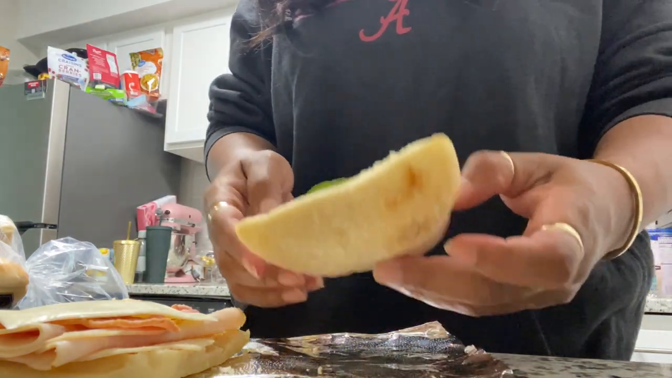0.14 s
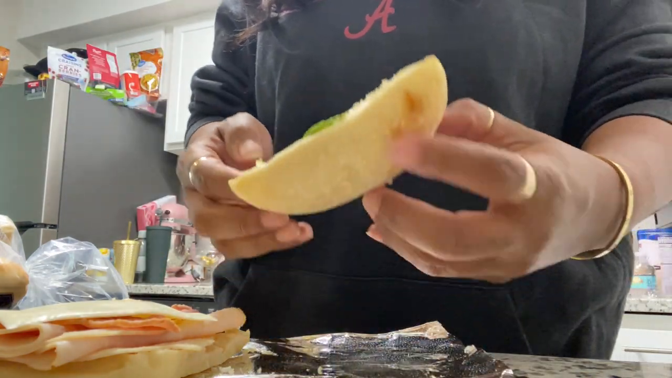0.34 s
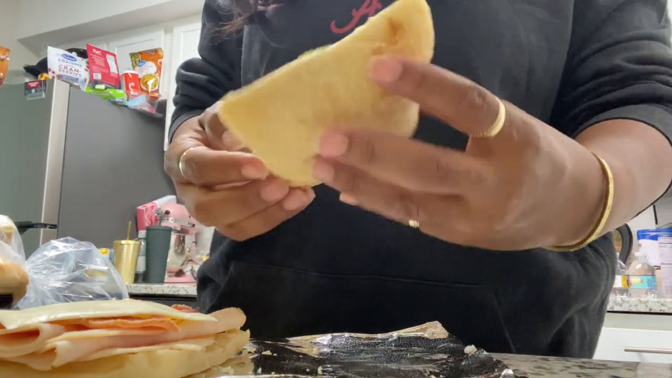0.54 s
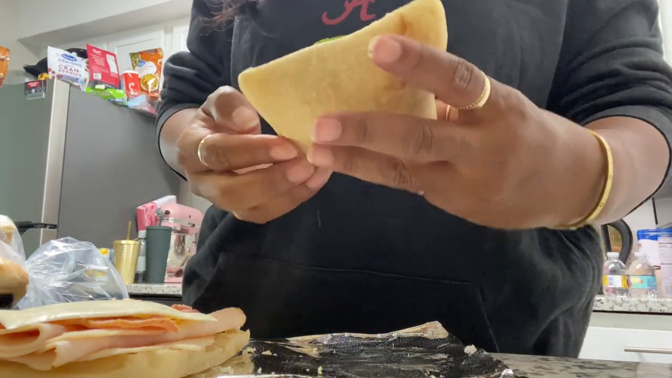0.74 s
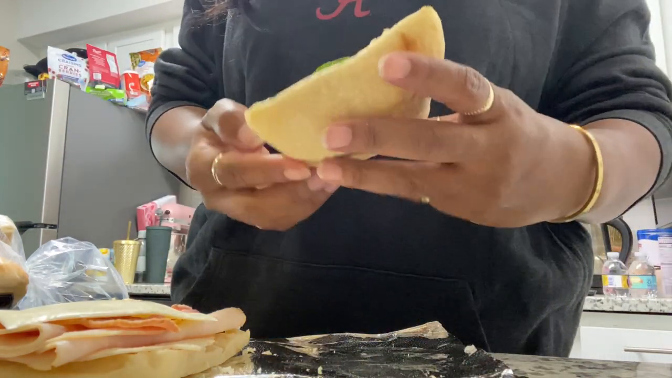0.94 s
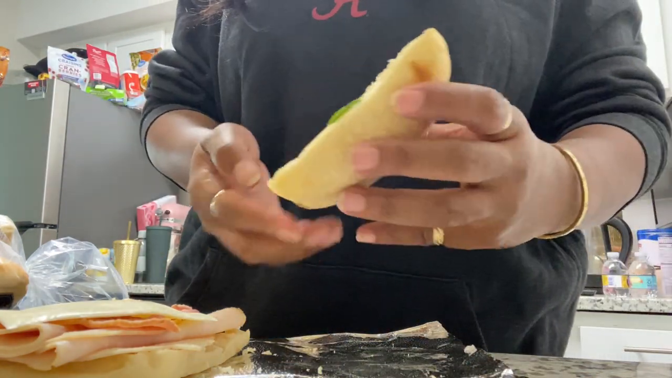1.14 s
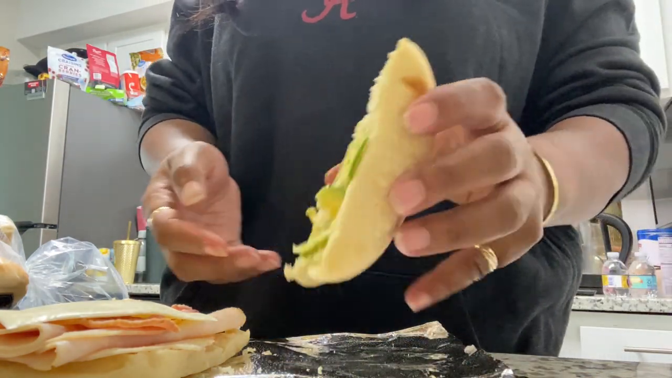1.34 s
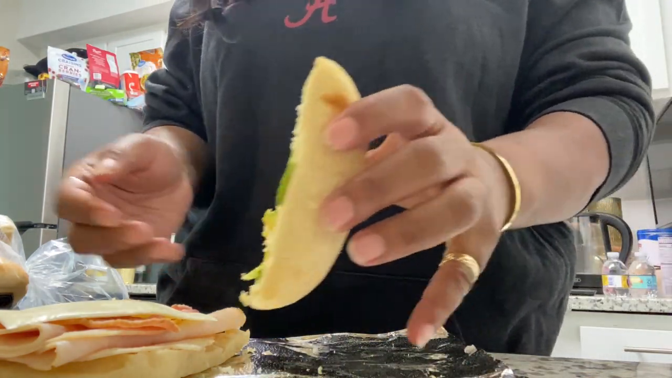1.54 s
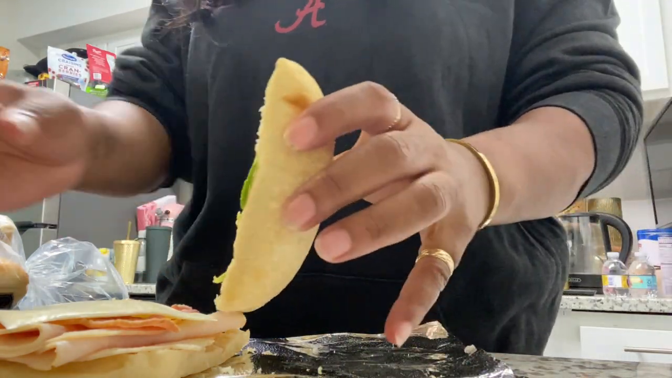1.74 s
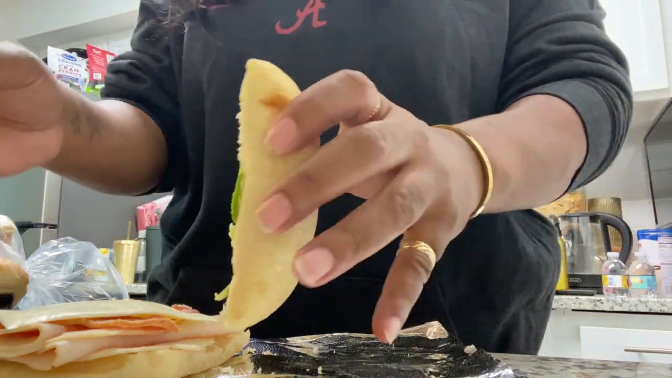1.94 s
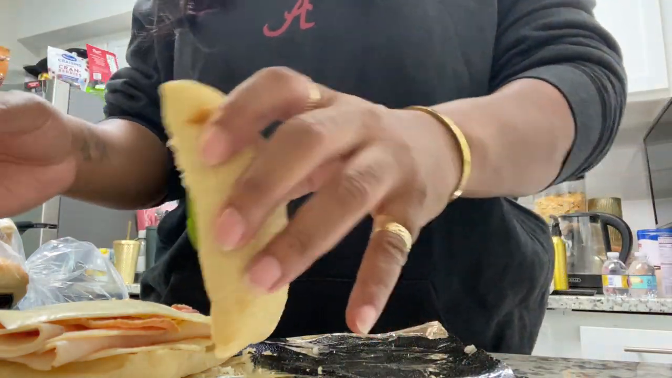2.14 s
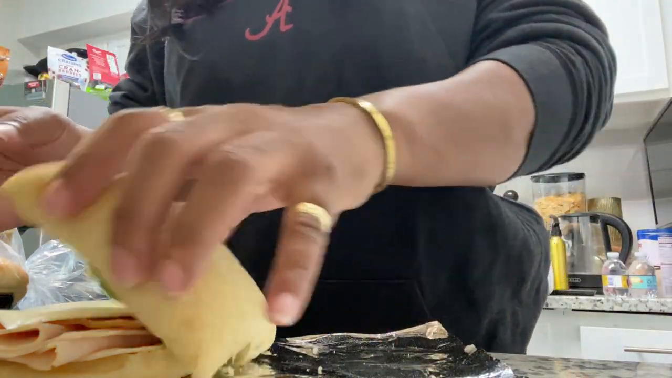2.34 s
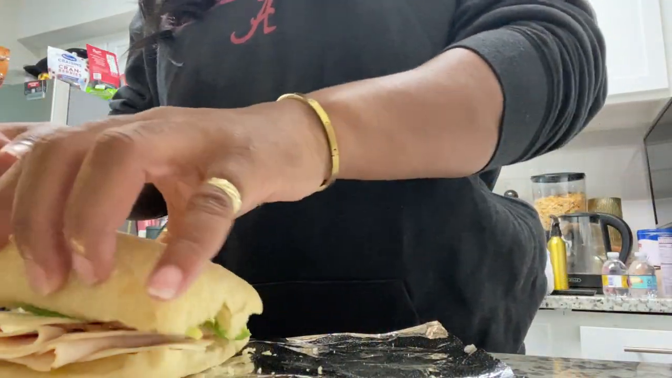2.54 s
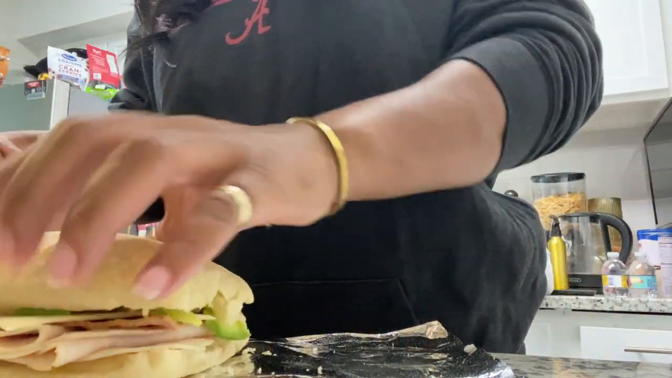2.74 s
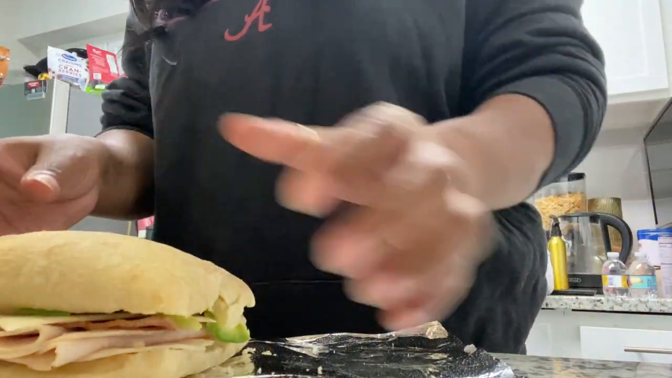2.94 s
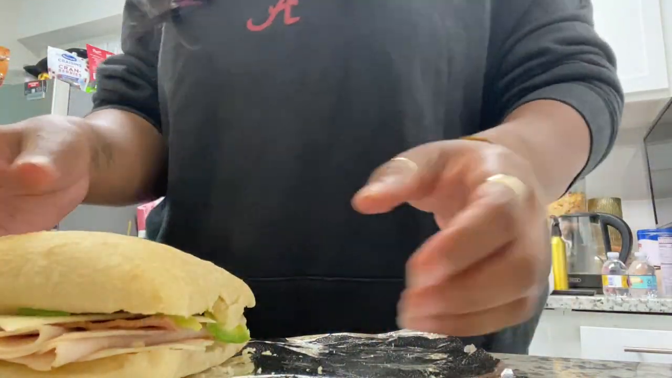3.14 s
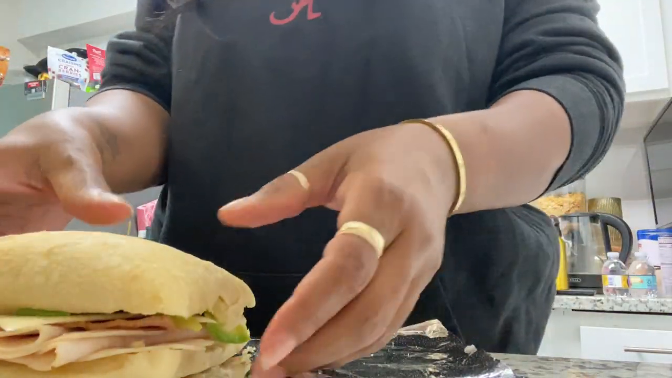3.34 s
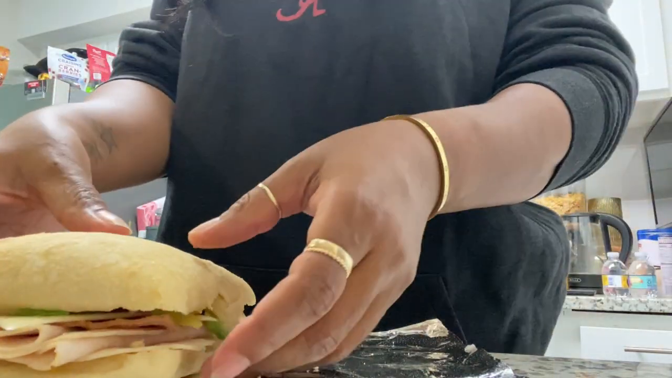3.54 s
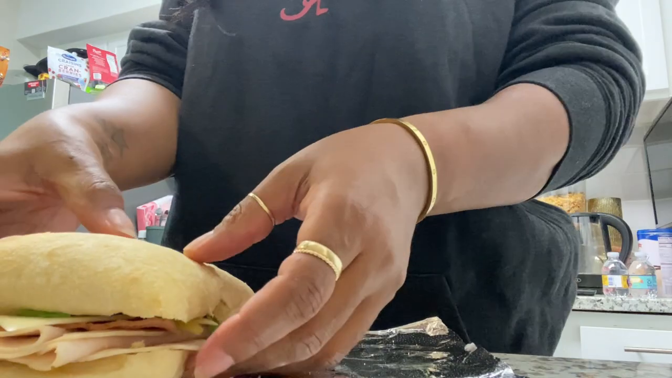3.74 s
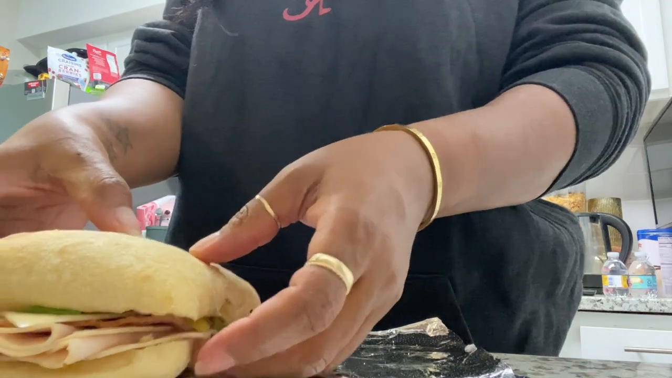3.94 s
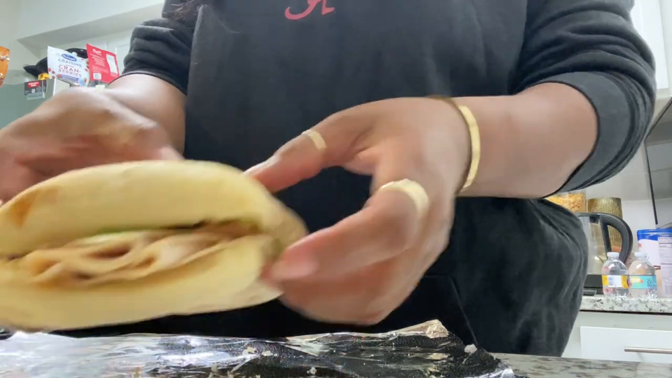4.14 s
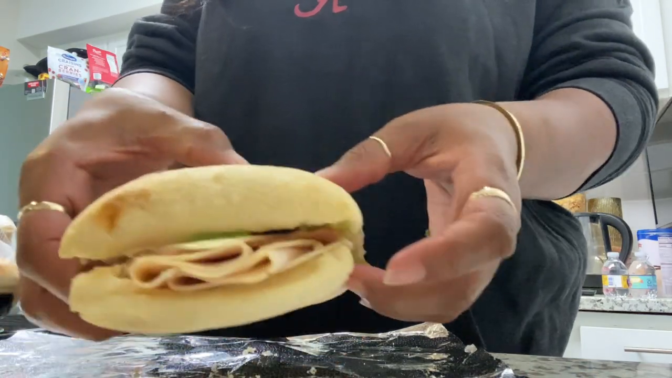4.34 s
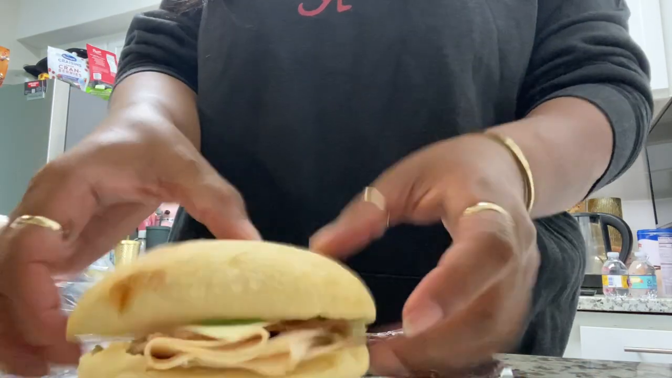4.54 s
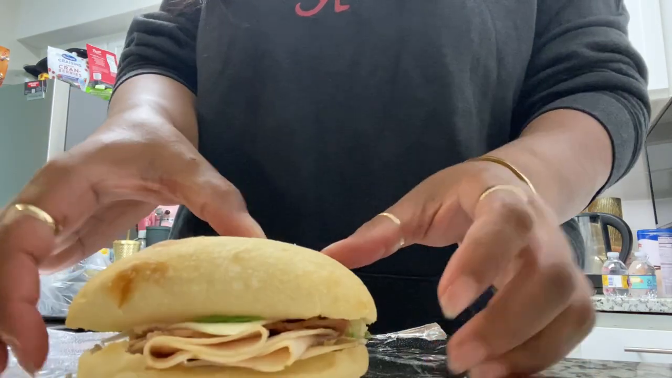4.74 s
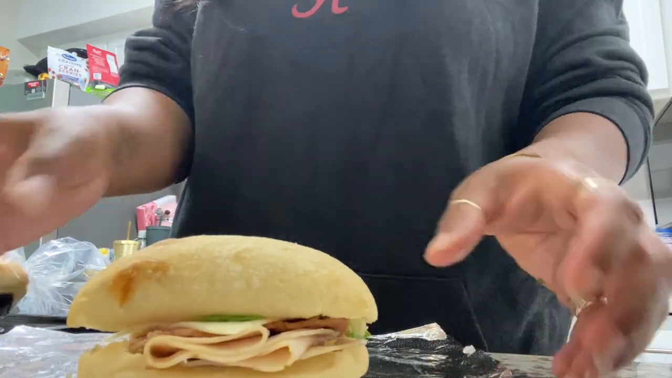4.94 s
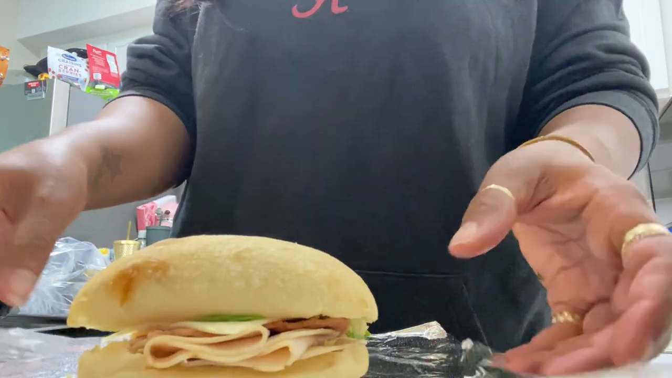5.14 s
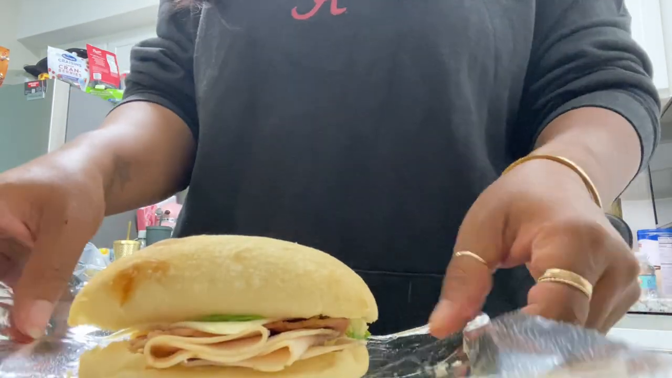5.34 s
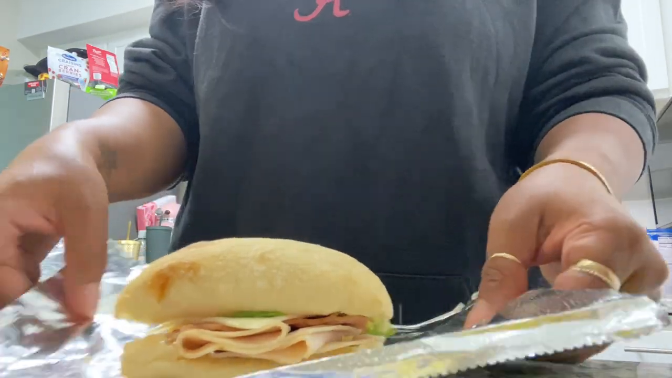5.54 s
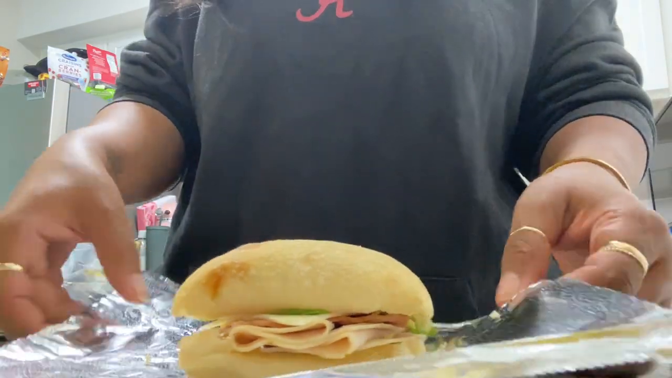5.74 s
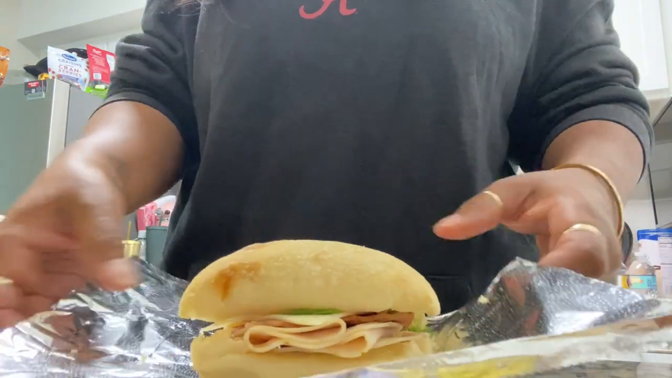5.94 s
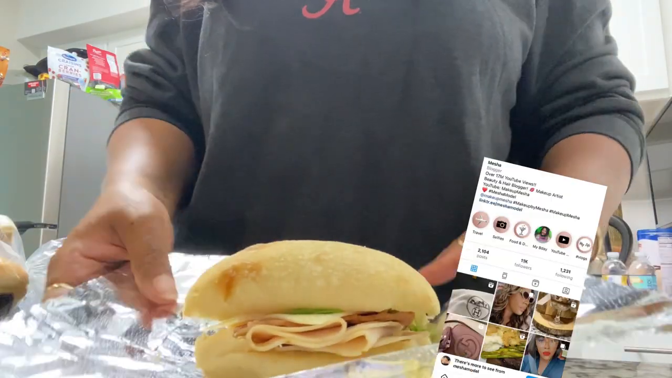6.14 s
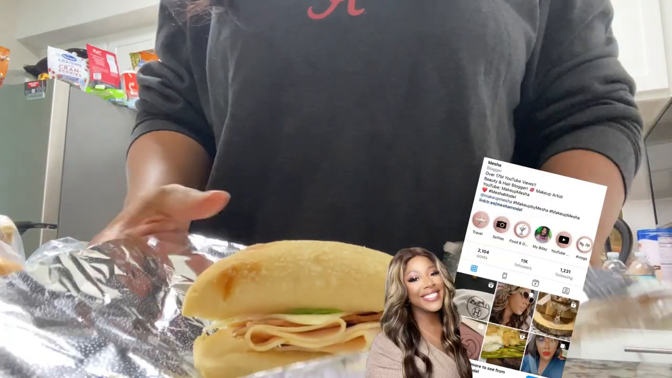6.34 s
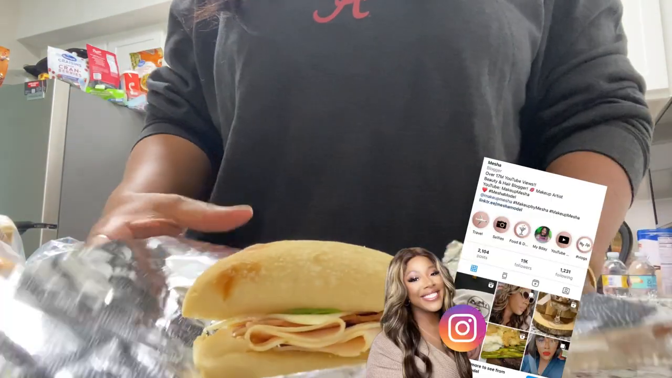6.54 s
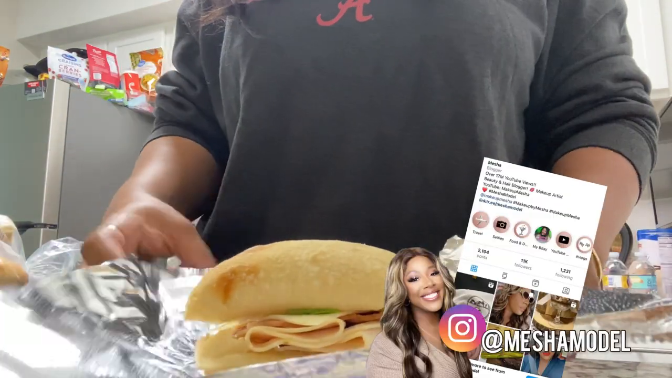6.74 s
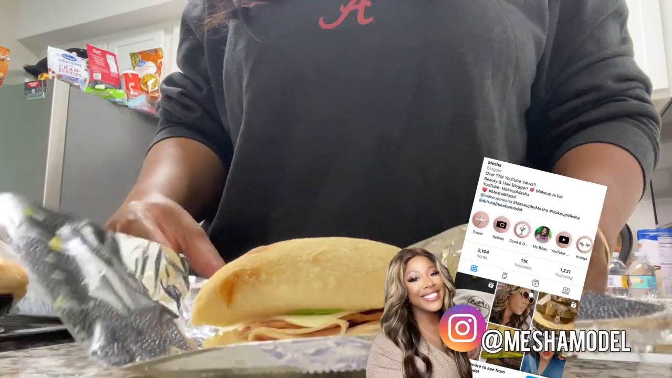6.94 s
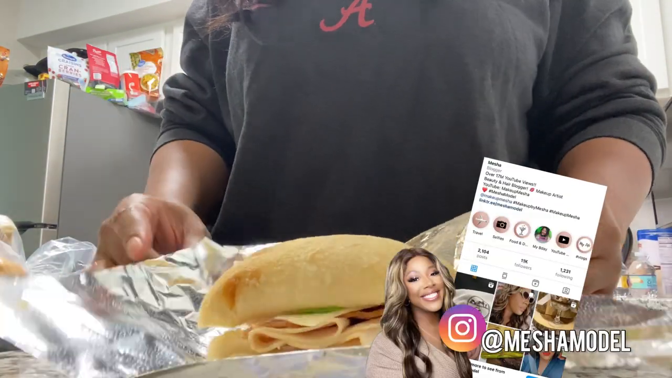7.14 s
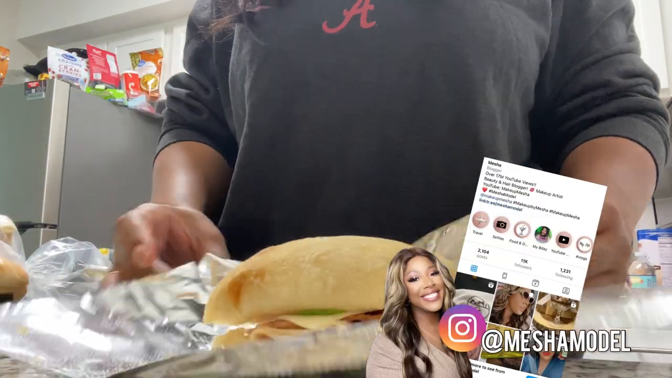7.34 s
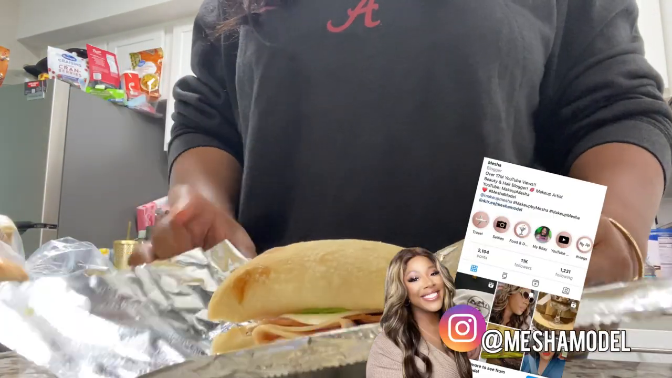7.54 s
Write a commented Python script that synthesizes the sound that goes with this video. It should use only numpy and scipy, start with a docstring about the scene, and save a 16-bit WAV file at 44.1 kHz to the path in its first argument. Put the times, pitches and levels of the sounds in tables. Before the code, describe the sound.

In a quiet kitchen with a faint, distant engine hum, aluminium foil snaps sharply along with a hollow knock and bumps on the counter. After a few small ticks the foil crinkles briefly, and a sandwich lands on it with a thud and a crack. Then the sheet is folded up close to the microphone, with dense, bright crackling, low flexing and little pops.

```python
"""Hands build a sandwich on aluminium foil on a stone kitchen counter, then fold the foil up.
A far engine drones over the quiet room. At 1.3 s creases snap, the counter bumps and something hollow
knocks. From 3.3 s the foil crinkles in showers of tiny creases, and at 4.5 s the sandwich lands with a
thud. From 5.1 s to the end the sheet is folded up: dense crackle, low flexing and panels popping.
Throughout, the treble is wide and slightly late on the right."""
import sys
import numpy as np
from scipy import signal
from scipy.fft import rfft, irfft, next_fast_len
from scipy.io import wavfile
from scipy.ndimage import uniform_filter1d

SR = 44100
rng = np.random.default_rng(int(sys.argv[2]) if len(sys.argv) > 2 else 0)


def dump_mix(stems):
    """Bounce the given channels to the path in sys.argv[1] as a 16-bit WAV at rate SR."""
    frames = np.atleast_2d(stems).T  # one column per channel
    limited = np.clip(frames, -1, 1)  # hard clip at full scale
    pcm = np.round(limited * 32767).astype(np.int16)
    wavfile.write(sys.argv[1], SR, pcm)


N = 339305
T = np.arange(N) / SR
HZ = np.fft.rfftfreq(next_fast_len(N + 4096), 1 / SR)
FFT_SIZE = 2 * len(HZ) - 2

# room tone EQ: freq_hz, gain_db
ROOM_EQ = [(15, -49), (25, -22.5), (64, 2), (97, -2), (141, -5.5), (200, -23), (335, -20.5), (503, -41.5),
           (863, -39), (2000, -47), (7110, -52.5), (9320, -65), (10400, -50.5), (12200, -63),
           (16000, -84.5)]
# faint background swells: start_s, length_s, centre_hz, width_hz, level_db
DRONES = [(0, 0.81, 325, 160, -65.5), (0.278, 0.27, 2450, 160, -84), (.98, 0.24, 1280, 110, -80),
          (2.852, .3, 1250, 296, -82)]
# the engine's lower hum: time_s, pitch_hz, level_db
ENGINE_LOW = [(0, 86.7, -50), (.2, 88.3, -56.5), (.57, 90.4, -48.5), (.95, 91.8, -51.5), (1.03, 89.2, -65),
              (1.13, 89, -46.5), (1.3, 86.1, -65), (1.8, 81, -54), (2.22, 81.4, -50), (2.36, 81, -63),
              (2.6, 81.5, -45), (2.9, 83.1, -59), (3.05, 84.1, -52), (3.35, 87.1, -64.5), (3.6, 83, -64)]
# the engine's upper hum: time_s, pitch_hz, level_db
ENGINE_HIGH = [(0, 131.1, -57), (.8, 131.8, -62.5), (1.7, 123, -55), (2.4, 123, -67.5), (3.3, 125, -64),
               (3.7, 126.2, -61.5), (4, 126, -63), (4.42, 126.3, -57)]
# bumps on the counter: start_s, level_db, pitch_hz
THUDS = [(1.282, -32, 85.7), (1.33, -30, 68), (1.4, -35.5, 85), (1.502, -32, 104), (3.348, -47.5, 95),
         (4.551, -18.5, 91.3), (5.978, -38, 118), (6.097, -40, 117.3), (6.298, -33.5, 81),
         (6.518, -43, 125), (6.799, -38, 127), (7.04, -35, 120), (7.166, -33, 95.7), (7.398, -32, 67),
         (7.569, -30, 86.6)]
# rattling contacts on the hollow thing: start_s, level_db, length_s
KNOCKS = [(1.278, -27.5, 0.078), (1.37, -48, 0.11), (1.492, -35, 0.022), (1.52, -48.5, 0.072),
          (1.6, -60.5, .08)]
# its resonances: pitch_hz, width_hz, gain_db
HOLLOW_MODES = [(126.5, 14, -12.5), (250, 31, -2), (325, 30, 1), (389, 8.6, -12.5), (548, 92, -7),
                (607, 30, 2), (633, 25, -3.5), (948, 49, -4), (1100, 20, -6.5), (1288, 43, -5.5),
                (1434, 95, -12.5), (2000, 200, -26)]
# pushes, grips and folds of the foil: start_s, length_s, rustle_db, ramp_db, flex_db, brightness_db
FOLDS = [(0.595, 0.069, -71.5, -5, -76, -9), (.84, .1, -84, -2.5, -75.5, -3),
         (1.255, 0.13, -62, 4.5, -54.5, -8), (1.416, 0.17, -55, -3.5, -56, -5),
         (1.595, 0.24, -66.5, -12, -60.5, -5.5), (1.9, 0.029, -80, 3.5, -78.5, -10),
         (2.262, .15, -73.5, -3, -66, -10.5), (2.595, 0.032, -74, 1, -88, -8.5),
         (2.66, 0.061, -63.5, -6.5, -65.5, -7.5), (2.844, 0.043, -86, -2, -75, 0),
         (3.313, 0.14, -52.5, 4.5, -53.5, 7.5), (3.435, .57, -47.5, -2, -56, -0.5),
         (4.522, 0.08, -68.5, -5.5, -37, -7.5), (4.633, 0.18, -55, -5, -61, -3.5),
         (5.121, 2.9, -42, 6, -50, -3), (5.11, 0.21, -31.5, 2, -43.5, 2.5),
         (5.322, 0.098, -30.5, 7, -43, 2.5), (5.424, 0.42, -31, -8, -43, 0),
         (5.858, .5, -30, 5.5, -40, -0.5), (6.413, 0.12, -32, 7, -39.5, -1),
         (6.53, 0.22, -29.5, -3, -37, -1), (6.742, 0.096, -31, 7.5, -38.5, -1),
         (6.859, 0.093, -32, -1, -36, -5.5), (6.98, 0.27, -31.5, -3, -36, -6),
         (7.324, .14, -29.5, 2.5, -38, -2.5), (7.482, 0.14, -36, -7.5, -41, -3.5),
         (7.617, 0.037, -32, 1, -40.5, -4)]
# faint low rustles of the sheet: start_s, length_s, level_db
STIRS = [(0.046, 0.89, -68.5), (.96, 0.32, -75.5), (2.03, .14, -74.5), (2.816, 0.37, -74.5),
         (4.07, 0.23, -83), (4.916, 0.12, -76.5), (5.037, 0.1347, -63.5)]
# dull body of the flexing sheet: freq_hz, gain_db
FLEX_EQ = [(40, -8), (90, 3.5), (170, -5), (240, -1), (320, 0.5), (430, -1.5), (620, 2.5), (1200, -2),
           (1700, -7.5), (2500, -14.5), (4000, -25)]
# buckling panels and small dull taps: start_s, level_db, pitch_hz, tick_offset_db
POPS = [(0.182, -50, 446, -15.5), (0.254, -54, 350, -12), (0.383, -49.5, 606, -3), (0.837, -61, 372, -2.5),
        (0.904, -58, 418, -3), (2.066, -58, 1007, -25), (2.261, -59, 1240, 0), (3.442, -43.5, 1240, -17),
        (3.534, -40, 1500, -2), (3.965, -45.5, 636, 2.5), (4.541, -27, 612, 0.5), (4.546, -31.5, 261, -20),
        (4.704, -51, 1340, -12), (4.97, -59, 434, -16), (5.059, -58, 600, -12), (5.147, -55, 584, -11),
        (5.387, -35, 1163, -14), (5.64, -38.5, 530, 6.5), (5.967, -30, 1080, 4.5), (6.621, -26.5, 603, -7),
        (6.695, -27, 857, -5.5), (6.812, -24.5, 627, -11), (6.921, -26, 614, -2), (6.991, -17.5, 642, -8),
        (7.045, -21.5, 808, -11), (7.166, -22.5, 1194, 4), (7.232, -37.5, 1020, 9),
        (7.636, -29.5, 906, 0.5)]
# single large creases: start_s, level_db, tail_t60_s
SNAPS = [(0.839, -41, 0.12), (0.8754, -48.5, 0.13), (0.9328, -51.5, 0.13), (0.9547, -50, 0.14),
         (1.1233, -59.5, 0.11), (1.1984, -63.5, 0.13), (1.282, -16.5, 0.16), (1.295, -15.5, 0.11),
         (1.317, -16.5, 0.17), (1.4314, -39, 0.13), (1.4424, -41, 0.095), (1.4864, -27, 0.14),
         (1.5196, -29.5, 0.12), (1.5523, -28.5, 0.13), (1.6062, -43, 0.093), (1.6283, -30, 0.098),
         (1.6888, -45, 0.12), (1.7395, -36.5, 0.11), (1.7641, -28.5, 0.09), (2.143, -48, 0.1),
         (2.1849, -47, 0.083), (2.2623, -42, 0.13), (2.272, -36.5, 0.12), (2.2884, -47, 0.11),
         (2.3491, -49, 0.11), (2.513, -42, 0.11), (2.6572, -33.5, 0.11), (2.667, -33.5, 0.095),
         (2.706, -41, 0.12), (2.9108, -57.5, 0.11), (3.0764, -54.5, 0.15), (3.2877, -32, 0.15),
         (3.327, -19, 0.21), (3.3428, -16.5, 0.13), (3.395, -26, 0.16), (3.4332, -22, 0.13),
         (3.4548, -22, 0.13), (3.4736, -26, 0.15), (3.5026, -21, 0.084), (3.5339, -19.5, 0.14),
         (3.5568, -23, 0.096), (3.585, -26, 0.093), (3.6141, -24.5, 0.06), (3.659, -21.5, 0.09),
         (3.69, -25.5, 0.12), (3.749, -29.5, 0.11), (3.764, -31, 0.097), (3.7808, -26.5, 0.17),
         (3.8675, -31.5, 0.11), (3.905, -28.5, 0.13), (3.9639, -27, 0.22), (4.0302, -34.5, 0.06),
         (4.0674, -42, 0.1), (4.121, -33, 0.12), (4.3294, -40.5, 0.1), (4.5067, -45, 0.33),
         (4.542, -3.5, 0.17), (4.6369, -26.5, 0.19), (4.7034, -29.5, 0.18), (4.7643, -27, 0.063),
         (5.1094, -29, 0.13), (5.1249, -21.5, 0.1), (5.1696, -12, 0.18), (5.2055, -8.5, 0.15),
         (5.2482, -13, 0.13), (5.3334, -16, 0.13), (5.3553, -18, 0.14), (5.3944, -6.5, 0.16),
         (5.5474, -20, 0.13), (5.583, -17.5, 0.097), (5.6243, -25, 0.13), (5.6387, -17.5, 0.11),
         (5.7488, -20, 0.15), (5.7708, -15, 0.12), (5.817, -13.5, 0.09), (5.8437, -21.5, 0.16),
         (5.8808, -13, 0.1), (5.9496, -20.5, 0.11), (5.969, -13.5, 0.12), (6.088, -11, 0.13),
         (6.237, -16.5, 0.13), (6.4465, -24, 0.13), (6.4611, -22.5, 0.17), (6.6177, -22.5, 0.13),
         (6.7884, -17, 0.2), (6.8837, -18.5, 0.15), (6.9127, -15, 0.13), (6.9915, -19.5, 0.13),
         (7.0337, -17.5, 0.13), (7.0985, -14.5, 0.13), (7.1666, -16.5, 0.1), (7.2002, -14.5, 0.11),
         (7.2302, -23, 0.13), (7.3442, -19.5, 0.19), (7.42, -12, 0.12), (7.443, -13, 0.098),
         (7.5486, -21, 0.12), (7.6359, -16, 0.13)]
# bright tone of one crease: freq_hz, gain_db
SNAP_EQ = [(1200, -16.5), (3000, -8), (5000, -3.5), (7500, 2.5), (10500, -0.5), (13500, -3), (16000, -18)]
# sizzle of many small creases: freq_hz, gain_db
CRINKLE_EQ = [(300, -20), (1500, -9), (2500, -5.5), (4500, -3), (6500, -1), (8000, 1), (9600, -2),
              (11700, -5), (13800, -7), (16000, -7)]
# stereo image, treble slightly late on the right: freq_hz, coherence, right_phase_rad, left_over_right_db
STEREO_IMAGE = [(58.5, 0.82, 0.83, -1.6), (300.4, 0.56, -0.7, -2), (726, 0.28, 2.5, -3.5),
                (2020, 0.13, -2, -0.5), (5600, .2, 2.5, 0), (7030, 0.19, -2, 1.5), (8220, 0.51, -2.5, 2),
                (8906, 1, -3, -1.5), (9410, 1, -3, 1.5), (11400, 0.4, -6, -1), (11700, 0.77, -6.5, -1),
                (13600, 0.8, -8, 1), (14200, 0.76, -9.5, 0), (15000, .99, -9.5, 0), (15600, .8, -10.5, -1)]
# dry tick of a popping panel: freq_hz, gain_db
POP_TICK_EQ = [(200, -18.5), (600, 5.0), (1800, -0.5), (4000, -18.5), (9000, -39.5)]


def amp(db):
    """Decibels to gain."""
    return 10 ** (np.asarray(db) / 20)


def decay(t, t60):
    """A fade that drops 60 dB in t60 seconds."""
    return amp(-60 * t / t60)


def unit_rms(x):
    """Normalises to an rms of one."""
    return x / np.sqrt(np.mean(x ** 2) + 1e-20)


def over_hz(points, column=1):
    """Draws a table column across the spectrum on a log frequency axis."""
    table = np.transpose(points)
    return np.interp(np.log(HZ + 1), np.log(table[0] + 1), table[column])


def equalise(x, eq):
    """Applies an EQ curve, keeping the rms of white noise."""
    return irfft(rfft(x, FFT_SIZE) * unit_rms(amp(over_hz(eq))), FFT_SIZE)[..., :N]


def add(mix, start, sound):
    """Drops a sound into the mix at start seconds."""
    part = mix[..., round(start * SR):][..., :sound.shape[-1]]
    part += sound[..., :part.shape[-1]]


def room_tone():
    """The quiet kitchen: a steady low rumble with a trace of hiss."""
    return amp(-58) * equalise(rng.standard_normal((2, N)), ROOM_EQ)


def drones():
    """Faint narrow bands of noise swell and fade in the background."""
    out = np.zeros((2, N))
    for start, length, hz, width, db in DRONES:
        resonance = (width / (width + 2j * (HZ - hz))) ** 2
        band = irfft(rfft(rng.standard_normal((2, N)), FFT_SIZE) * resonance, FFT_SIZE)
        swell = signal.windows.tukey(round(length * SR), 0.6)
        add(out, start, amp(db) * swell * unit_rms(band)[:, :len(swell)])
    return out


def engine(waver_db=2.5):
    """A far engine hums in two low wavering tones, a little to the left."""
    tones = np.zeros(N)
    for hum in (ENGINE_LOW, ENGINE_HIGH):
        times, pitches, levels = np.transpose(hum)
        waver = sum(np.sin(2 * np.pi * (hz * T + rng.random())) for hz in np.geomspace(1, 8, 12))
        level_db = np.interp(T, times, levels) + waver_db * unit_rms(waver)
        cycles = np.cumsum(np.interp(T, times, pitches)) / SR + rng.random()
        tones += amp(level_db) * np.sin(2 * np.pi * cycles)
    return np.sqrt(2) * tones * amp([[1.5], [-1.5]])


def thuds(ring_hz=63):
    """The counter and the microphone stand ring low after each bump."""
    out, t = np.zeros(N), np.arange(SR // 2) / SR
    attack = 1 - np.exp(-t / 0.013)
    for start, db, hz in THUDS:
        cycles = hz * (t + 0.0042 * (1 - np.exp(-t / 0.0095)))  # starts sharp, then settles
        ring = np.sin(2 * np.pi * cycles) + amp(-7) * np.sin(2 * np.pi * ring_hz * t)
        add(out, start, amp(db + 4.5) * attack * decay(t, t60=0.15) * ring)
    return out


def knocks():
    """Short rattles of contacts drive the modes of a hollow thing on the left."""
    rattle = np.zeros(N)
    for start, db, length in KNOCKS:
        burst = signal.windows.tukey(round(length * SR), 0.15)
        add(rattle, start, amp(db) * burst * rng.standard_normal(len(burst)))
    body = sum((-1) ** k * amp(db) * width / (width + 2j * (HZ - hz))
               for k, (hz, width, db) in enumerate(HOLLOW_MODES))
    body /= np.sqrt(np.mean(abs(body) ** 2))
    delay_s = np.array([[0], [0.00032]])
    pan = amp([[2.5], [-2.5]]) * np.exp(-2j * np.pi * HZ * delay_s)  # later and weaker on the right
    return irfft(rfft(rattle, FFT_SIZE) * pan * body, FFT_SIZE)[:, :N]


def handling(attack_s=0.03, release_db_per_s=350):
    """Each move of the hands rises, ramps and dies away: gives rustle power, flex power, brightness."""
    rustle = np.full(N, amp(-87.5) ** 2)  # both floors are the sheet left alone
    flex = np.full(N, amp(-81.5) ** 2)
    weighted_brightness = np.zeros(N)
    for start, length, rustle_db, ramp_db, flex_db, brightness_db in FOLDS:
        t = np.arange(0, length + 0.3, 1 / SR)
        shape_db = ramp_db * np.minimum(t / length, 1) - release_db_per_s * np.maximum(t - length, 0)
        power = (np.minimum(t / attack_s, 1) * amp(shape_db)) ** 2
        add(rustle, start, amp(rustle_db) ** 2 * power)
        add(flex, start, amp(flex_db) ** 2 * power)
        add(weighted_brightness, start, brightness_db * amp(rustle_db) ** 2 * power)
    for start, length, db in STIRS:
        add(flex, start, (amp(db) * np.hanning(round(length * SR))) ** 2)
    return rustle, flex, weighted_brightness / rustle


def shimmer(depth_db):
    """Noise whose narrow resonances come and go as the facets of the sheet change shape."""
    spectra = signal.stft(rng.standard_normal((2, N)), nperseg=512, noverlap=384)[2]
    patches = uniform_filter1d(rng.standard_normal(spectra.shape[1:]), size=3, axis=0)  # across pitch
    patches = uniform_filter1d(patches, size=14, axis=1)  # across time
    spectra *= amp(depth_db * unit_rms(patches))
    return unit_rms(signal.istft(spectra, nperseg=512, noverlap=384)[1][:, :N])


def ring_out(power, t60):
    """Gives each impulse a dying tail of the same total power."""
    feedback = 10 ** (-6 / (t60 * SR))
    return signal.lfilter([1 - feedback], [1, -feedback], power)


def shower(per_s, spread_db, crack_t60, ring_t60, ring_share):
    """Envelope of many random creases, a few large: a short crack, then the sheet ringing on."""
    sizes = amp(spread_db * np.minimum(rng.exponential(1, N), 5))
    hits = sizes ** 2 * (rng.random(N) < per_s / SR)
    power = (1 - ring_share) * ring_out(hits, crack_t60) + ring_share * ring_out(hits, ring_t60)
    return unit_rms(np.sqrt(power))


def flexing(power):
    """Large areas of the sheet wobble and rumble in slow, dull grains."""
    grains = shower(per_s=400, spread_db=0.91, crack_t60=0.015, ring_t60=0.059, ring_share=1)
    return equalise(amp(0.5) * np.sqrt(power) * grains * shimmer(depth_db=3), FLEX_EQ)


def pops():
    """A panel flips over: a dry tick, and a short ring that sags in pitch and lags on the right."""
    rings, ticks, t = np.zeros((2, N)), np.zeros(N), np.arange(SR // 10) / SR
    ring_shape = np.minimum(t / 0.00016, 1) * decay(t, t60=0.043)
    sag = 1 - 6.7 * np.minimum(t, 0.02)
    lag_cycles = np.array([[0], [0.2]])
    for start, db, hz, tick_offset_db in POPS:
        cycles = hz * t * sag - lag_cycles
        add(rings, start, amp(db - 0.5) * ring_shape * np.sin(2 * np.pi * cycles))
        add(ticks, start, amp(db + tick_offset_db) * decay(t, t60=0.069))
    return rings * amp([[1.5], [-1.5]]) + equalise(ticks * rng.standard_normal((2, N)), POP_TICK_EQ)


def snaps():
    """Each large crease cracks within a few milliseconds and leaves a shimmering tail."""
    power, t = np.zeros(N), np.arange(SR // 3) / SR
    attack = np.minimum(t / 0.00033, 1)
    crack = 0.6 * decay(t, t60=0.009) ** 2
    body = 0.23 * decay(t, t60=0.054) ** 2
    for start, db, tail_t60 in SNAPS:
        tail = 0.22 * decay(t, tail_t60) ** 2
        add(power, start, amp(db - 3.5) ** 2 * attack * (crack + body + tail))
    return equalise(np.sqrt(power) * shimmer(depth_db=4.5), SNAP_EQ)


def crinkle(power, brightness_db, split_hz=6000):
    """Showers of small creases follow the effort, with crisp crackle on top; tight folds are brighter."""
    effort = amp(3.5) * np.sqrt(power)
    wash = shower(per_s=1500, spread_db=1.6, crack_t60=0.003, ring_t60=0.065, ring_share=0.96)
    crackle = shower(per_s=260, spread_db=2.1, crack_t60=0.00081, ring_t60=0.036, ring_share=0.22)
    grains = unit_rms(wash + amp(-14) * crackle)
    sheet = equalise(effort * grains * shimmer(depth_db=2.9), CRINKLE_EQ)
    lows = signal.sosfilt(signal.butter(1, split_hz, fs=SR, output="sos"), sheet)
    tilt = amp(brightness_db)
    return lows / tilt + (sheet - lows) * tilt


def stereo_image(pair):
    """The treble is slightly delayed on the right, nearly opposite to the left around 9 and 15 kHz."""
    left, independent = rfft(pair, FFT_SIZE)
    coherence = over_hz(STEREO_IMAGE, column=1)
    shifted = np.exp(1j * over_hz(STEREO_IMAGE, column=2)) * left
    right = coherence * shifted + np.sqrt(1 - coherence ** 2) * independent
    balance = amp(over_hz(STEREO_IMAGE, column=3) / 2)
    return irfft(np.array([left * balance, right / balance]), FFT_SIZE)[:, :N]


def scene():
    """Room and foil noise share one stereo image; pops, knocks, thuds and engine are placed directly."""
    room = room_tone()
    rustle_power, flex_power, brightness_db = handling()
    foil = crinkle(rustle_power, brightness_db) + snaps() + flexing(flex_power)
    return stereo_image(foil + room + drones()) + pops() + knocks() + thuds() + engine()


def record(dry):
    """A steep high cut takes off the very top of the treble."""
    high_cut = signal.firwin(255, cutoff=15930, window=("kaiser", 9), fs=SR)
    return signal.oaconvolve(dry, high_cut[None], "same")


dry = scene()
out = record(dry)
dump_mix(out)
```